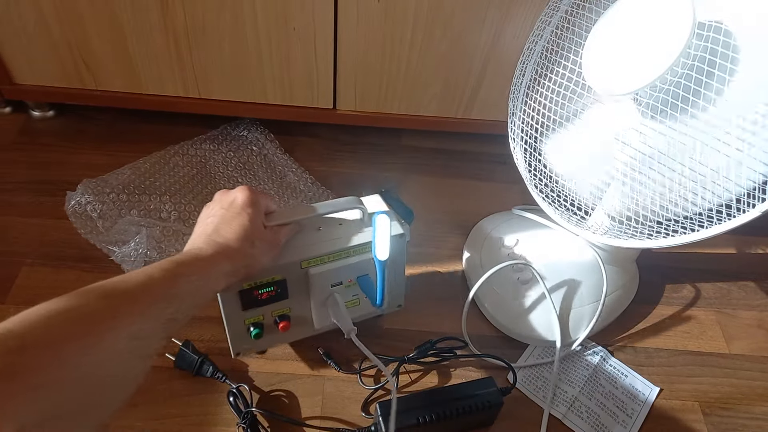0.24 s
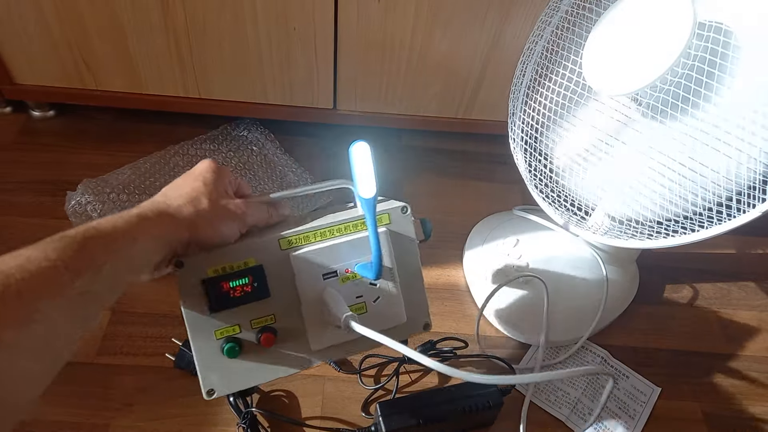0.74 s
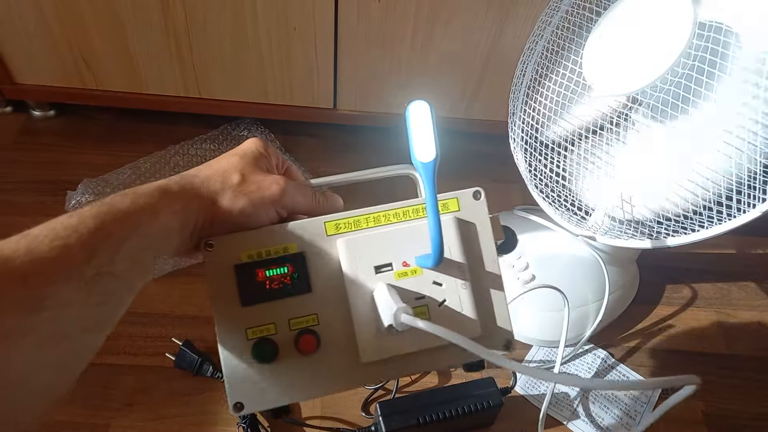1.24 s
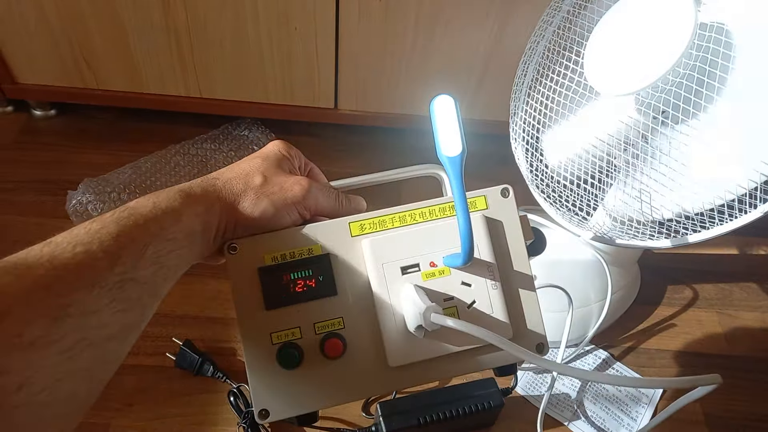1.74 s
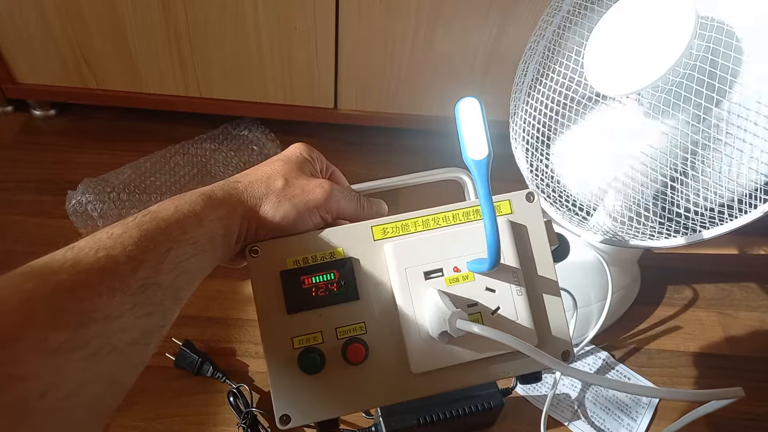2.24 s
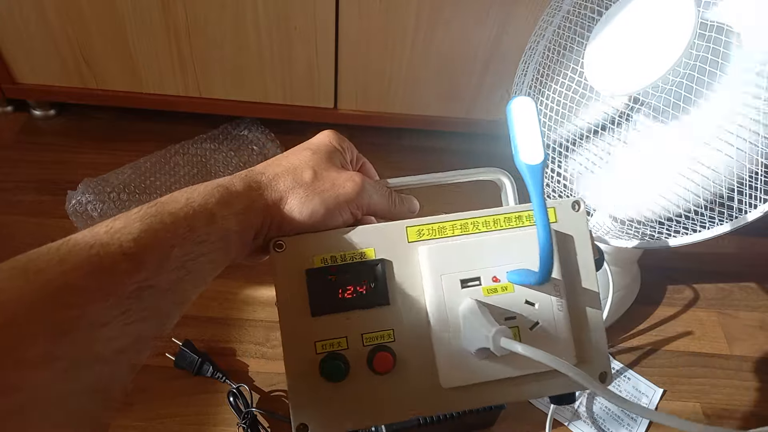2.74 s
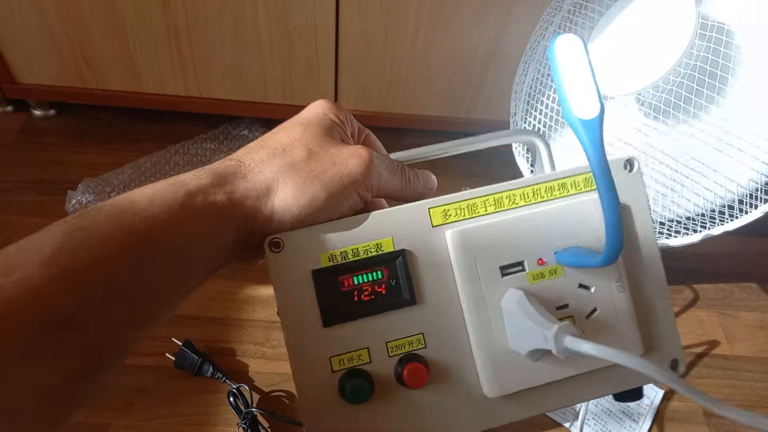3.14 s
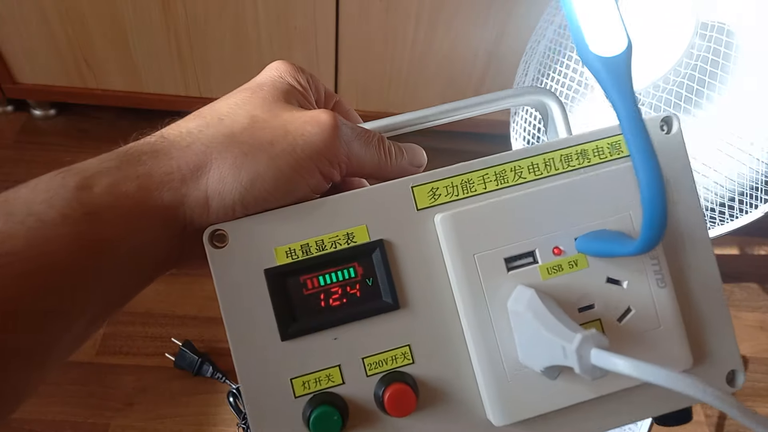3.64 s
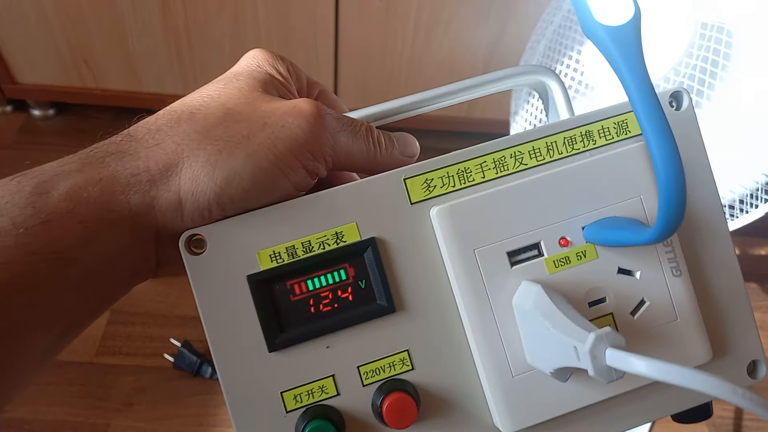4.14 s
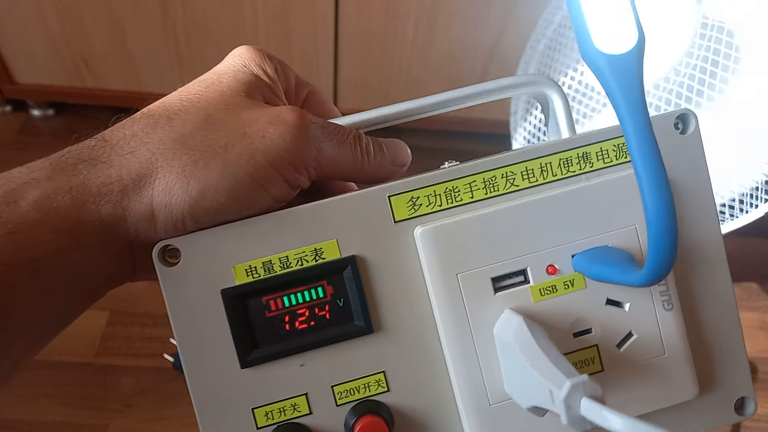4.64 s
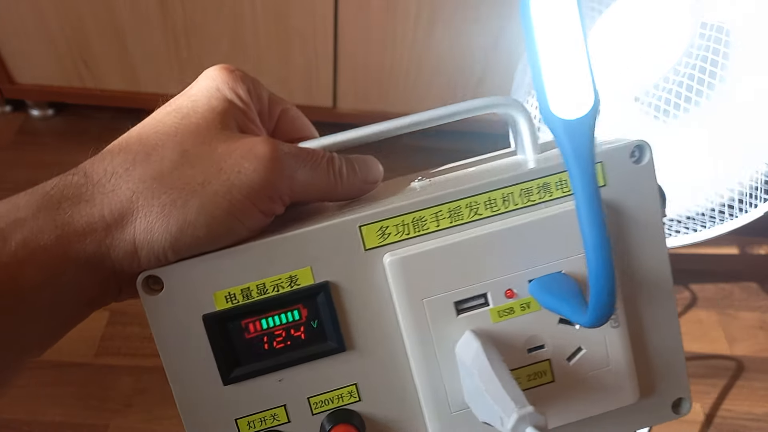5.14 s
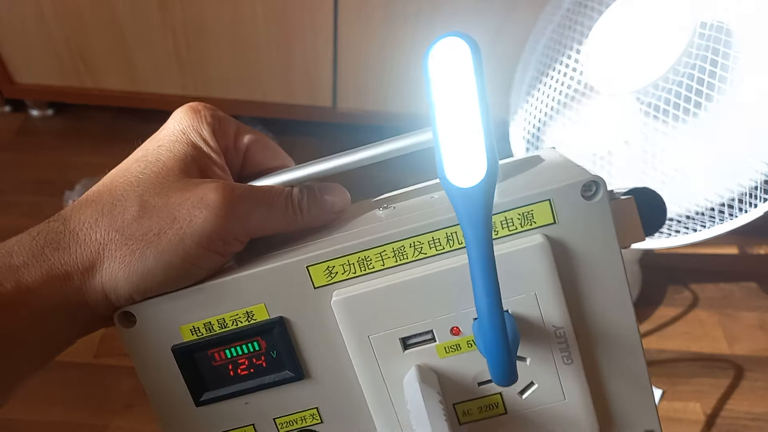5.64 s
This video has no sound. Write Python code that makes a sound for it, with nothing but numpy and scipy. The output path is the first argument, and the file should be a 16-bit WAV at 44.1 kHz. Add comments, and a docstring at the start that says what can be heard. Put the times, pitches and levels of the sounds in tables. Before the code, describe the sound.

A small desk fan runs close by in a furnished room, with a throbbing electrical hum and a soft rush of air. At the start a plastic box clicks sharply and a finger rubs and thumps the microphone on the left. The sound dips for about a second, then the fan comes back up. A tick and a few dull knocks follow as the box is lifted by its handle.

```python
"""A small desk fan, close by and off to the right, on a stereo microphone in a furnished room. Its motor
hums on the mains harmonics and throbs as the rotor slips; air rushes through blades and grille.
The fan's hand-held power box clicks, ticks and knocks as it is lifted. A finger thumps the left port,
and the recorder's limiter ducks everything for a good second before it recovers. Early on, the
microphone moves out of the room's standing waves."""
import sys
import numpy as np
from scipy import signal
from scipy.fft import rfft, irfft
from scipy.io import wavfile
from scipy.ndimage import uniform_filter1d, minimum_filter1d

SR = 44100
rng = np.random.default_rng(int(sys.argv[2]) if len(sys.argv) > 2 else 0)


def dump_mix(stems):
    """Bounce the given channels to the path in sys.argv[1] as a 16-bit WAV at rate SR."""
    frames = np.atleast_2d(stems).T  # one column per channel
    limited = np.clip(frames, -1, 1)  # hard clip at full scale
    pcm = np.round(limited * 32767).astype(np.int16)
    wavfile.write(sys.argv[1], SR, pcm)


N = 259308

BUZZ_HZ, THROB_HZ = 100.213, 13.11
# the low hum swells late in a throb cycle, the overtones above it earlier
HUM_HZ, SWELL_SPAN_HZ = 300, 370
HUM_SWELL_CYCLES, WHINE_SWELL_CYCLES = 0.82, 0.17
WHINE_MULTIPLE, WHINE_SWING = 17, 0.71
RUSH_DB, RUSH_NEAR_DB = -1, 1.5   # air gain, and its lift before the microphone moves away
LEAVE_AT_S, LEAVE_S = .72, 0.19
ROOM_T60_S, PORT_LAG_S, CUTOFF_HZ = 0.22, .00013, 15800

# motor lines: (multiple of the buzz [rounded in use], base level [dB], left-right [dB])
MOTOR_LINES = [ (1, -60, 3), (2, -68, 5.5), (3, -34.5, 3), (4, -60.5, 4), (5, -57.5, 10.5), (6, -59, -13),
               (7, -74, 19), (8, -69.5, 1.5), (9, -54.5, -5), (10, -60.5, -0.5), (11, -76, -1.5),
               (13, -72, -6.5), (14, -70, -12.5), (15, -72, -4), (16, -68.5, -1.5), (17, -63.5, 7.5),
               (19, -76, -8.5), (21, -70.5, -0.5), (22, -80.5, -1.5), (26, -74.5, -5), (27, -80, -12),
               (28, -88.5, 5.5), (63.7, -93.5, 8.5)]
# how the lines throb and wander: (frequency [Hz], depth [0-1], phase sway [rad], wander [dB])
THROB_BY_PITCH = [(300, .69, .7, .25), (500, .22, .25, 1.8), (620, .2, .2, 2.4), (920, .7, .3, 1.1),
                  (1400, .3, .3, 2.2), (1700, .65, .3, 1.6), (3000, .5, .4, 2.2)]
# the 1.7 kHz whine comes and goes; WHINE_SWING scales this curve: (time [s], unscaled level [dB])
WHINE_CURVE = [(2.0, -64), (2.78, -77.5), (2.86, -70), (4.07, -64), (4.25, -75.5), (5.84, -70.5),
               (5.88, -76.5)]
# standing waves at the microphone's first spot: (centre [Hz], width [Hz], left [dB], right [dB])
ROOM_WAVES = [(492, 98, 11.5, 14.5), (2600, 110, 12.5, 9.5), (6510, 200, 19.5, 16.5)]
# air through blades and grille: (frequency [Hz], base density [dB], left-right [dB], likeness [0-1])
AIR_SPECTRUM = [(20, -103, 6.5, .5), (47.3, -99, 3.5, 0.56), (74, -84.5, 15.5, 1), (116, -69.5, 1, 0.11),
                (171, -83, 3, 0.44), (359, -68.5, 1.5, 0.72), (493, -87.5, 4, 1), (570, -82, 2, 0.98),
                (1110, -86.5, 2, 0.057), (2510, -89, -5, 0.3), (3230, -104, 8, 0.06),
                (3700, -104, 8, 0.058), (5830, -108, 6, 0.22), (6000, -104, 11, 0.057),
                (7400, -108, -4.5, 0.057), (12500, -101, 0, .1), (15000, -106.5, 5.5, 0.1)]
# finger on the left port: (time [s], length [s], peak [dB], upper edge [Hz])
FINGER_THUMPS = [(0.0, 0.096, -13.5, 108), (0.093, 0.13, -17, 93.5), (0.214, 0.092, -16.5, 99),
                 (0.316, 0.11, -13.5, 113.6), (0.365, 0.062, 4, 127), (0.432, 0.056, 9, 306),
                 (0.486, 0.066, 5.5, 248), (0.542, .06, 10.5, 300), (0.582, 0.086, -4, 145)]
# small sharp ticks of the box: (time [s], dry peak [dB], left-right [dB], brightness [Hz])
BOX_TICKS = [(.018, -35, 21, 6970), (.2905, -35, 23, 3000), (2.368, -31, 10, 9000)]
# their bright ring: (frequency [Hz], relative level [dB], t60 [s])
TICK_RING = [(3770, -8.5, 0.0056), (4670, -14.5, 0.021), (5920, -3.5, 0.011), (6530, -3, 0.015),
             (6070, -11, 0.025)]
# clicks of the plastic case: (time [s], dry peak [dB], left-right [dB], brightness [Hz])
CASE_CLICKS = [(.0262, -19.5, 9.5, 7340), (.0375, -21.5, -16, 7060), (.0502, -12.5, 5.5, 6600),
               (.2635, -43, 22, 3980)]
# modes of the case: (frequency [Hz], relative level [dB], t60 [s])
CASE_MODES = [(1360, -10.5, 0.02), (1747, -8.5, 0.051), (2320, -12.5, 0.085), (2660, -0.5, 0.0078),
              (3197, -10, 0.021), (3740, 12, 0.0013), (4260, -6.5, 0.0052), (5800, -17, 0.0023),
              (6570, -5, 0.014)]
# dull knocks of the carrying handle: (time [s], dry peak [dB], left-right [dB], brightness [Hz])
HANDLE_KNOCKS = [(2.4, -34, 3.5, 800), (2.842, -29.5, 6.5, 1600), (2.851, -32.5, 1.5, 500),
                 (3.6872, -26.5, 4, 1800), (3.694, -31.5, 11.5, 1470), (3.7125, -51, -1, 3940)]
# modes of the hollow box under the handle: (frequency [Hz], relative level [dB], t60 [s])
BOX_MODES = [(414, 0, 0.057), (575, 0, 0.062), (680, -4.5, 0.054), (805, -3, 0.054), (1070, -6.5, 0.048),
             (1375, -4.5, 0.03), (1590, 1.5, 0.029), (2260, -7, 0.026), (5300, -3, .02)]


def from_db(db):
    """Decibels to gain."""
    return 10 ** (np.asarray(db) / 20)


def rms_one(x):
    """Scale to unit power."""
    return x / np.sqrt(np.mean(x ** 2) + 1e-20)


def seconds():
    """Time of every sample."""
    return np.arange(N) / SR


def pan(left_right_db):
    """Gains of the two channels."""
    return from_db(np.array([[.5], [-.5]]) * left_right_db)


def butter(x, edge_hz, kind, order=2):
    """Causal Butterworth filter."""
    return signal.sosfilt(signal.butter(order, edge_hz, kind, fs=SR, output="sos"), x)


def drift(rate_hz):
    """Smooth random curve of spread 1 that changes about rate_hz times a second."""
    pole = np.exp(-80 * np.pi * rate_hz / SR)
    slow = signal.lfilter([1], [1, -2 * pole, pole * pole], rng.standard_normal(N // 40 + 2002))[2000:]
    return np.interp(np.arange(N) / 40, np.arange(len(slow)), rms_one(slow))


def delayed(x, lag_s):
    """Both channels arrive later, by a fixed or a moving lag."""
    t = seconds()
    return np.array([np.interp(t - lag_s, t, channel) for channel in x])


def add(out, at_s, sound):
    """Mix a short stereo sound in at its time."""
    start = max(round(at_s * SR), 0)
    out[:, start:start + sound.shape[1]] += sound[:, :N - start]


def motor(uneven_db=0.52, sway_lag_cycles=0.067, lopsided=0.1, jitter=0.3):
    """Magnetic pull shakes the motor twice a mains cycle; rotor slip swells and sways each line."""
    t, out = seconds(), np.zeros((2, N))
    points_hz, *columns = np.transpose(THROB_BY_PITCH)
    unsteady_db = uneven_db * drift(10.0)
    for multiple, level_db, side_db in MOTOR_LINES:
        harmonic = round(multiple)
        hz = harmonic * BUZZ_HZ
        depth, sway, wander_db = [np.interp(hz, points_hz, c) for c in columns]
        hum_share = np.exp(-max(hz - HUM_HZ, 0) / SWELL_SPAN_HZ)
        swell_cycles = WHINE_SWELL_CYCLES + (HUM_SWELL_CYCLES - WHINE_SWELL_CYCLES) * hum_share
        slip = 2 * np.pi * (THROB_HZ * t - swell_cycles)
        late = slip - 2 * np.pi * sway_lag_cycles
        swell = 1 + depth * (np.cos(slip) - lopsided * np.cos(2 * slip))   # round tops, sharp dips
        swing = sway * (np.cos(late) + lopsided * np.cos(2 * late))
        line = (swell + 1j * swing) * np.exp(2j * np.pi * (hz * t + rng.random()))
        lift_db = unsteady_db + standing_wave_db(hz) + (whine_db() if harmonic == WHINE_MULTIPLE else 0)
        shortness = min(harmonic / 10, 2)   # short waves change more from place to place
        for channel in range(2):
            turn = shortness * jitter * drift(3)
            gain = from_db(level_db + lift_db[channel] + wander_db * drift(2.6)) * pan(side_db)[channel]
            out[channel] += np.sqrt(2) * gain * np.real(line * np.exp(1j * turn))
    return out


def whine_db():
    """Rise and fall of the whine about its mean level."""
    level_db = np.interp(seconds(), *np.transpose(WHINE_CURVE))
    return WHINE_SWING * (level_db - level_db.mean())


def at_first_spot():
    """Falls smoothly from 1 to 0 as the microphone leaves the place where it began."""
    return 1 / (1 + np.exp((seconds() - LEAVE_AT_S) / LEAVE_S))


def standing_wave_db(hz):
    """Standing waves lift the lines near their pitch until the microphone moves away."""
    boost_db = sum(np.array([[left_db], [right_db]]) * np.exp(-.5 * ((hz - centre_hz) / width_hz) ** 2)
                   for centre_hz, width_hz, left_db, right_db in ROOM_WAVES)
    return boost_db * at_first_spot()


def air(gain_db, flutter=0.054, swell_cycles=0.33):
    """Smooth rush of the blades, fluttering a little in step with the motor."""
    hz = np.maximum(np.arange(N // 2 + 1) * SR / N, 1)
    points_hz, *columns = np.transpose(AIR_SPECTRUM)
    level_db, side_db, alike = [np.interp(np.log(hz), np.log(points_hz), c) for c in columns]
    mid, side = rfft(rng.standard_normal((2, N)))
    ports = np.sqrt(1 + alike) * mid + np.sqrt(1 - alike) * side * [[1], [-1]]
    rush = irfft(ports * from_db(level_db) * pan(side_db), N) * np.sqrt(SR) / 2
    swell = 1 + flutter * np.cos(2 * np.pi * (THROB_HZ * seconds() - swell_cycles))
    return moving_echoes(rush) * from_db(gain_db) * swell


def moving_echoes(x, echo_db=-12, sway_s=0.00017, above_hz=1800, count=6):
    """Floor and cupboard send back the treble; as the microphone moves, their comb pattern shifts."""
    treble = butter(x, above_hz, "high")
    echoes = sum(delayed(treble, rng.uniform(0.00093, .009) + sway_s * drift(0.92)) for _ in range(count))
    return x + from_db(echo_db) * echoes


def finger_thumps(low_hz=68, body_hz=75, right_db=-52):
    """Skin drags over the left port in short lumps of rumble, brighter when pressed harder."""
    out = np.zeros((2, N))
    for at_s, length_s, peak_db, top_hz in FINGER_THUMPS:
        rumble = butter(rng.standard_normal((2, SR // 2)), low_hz, "high", order=4)
        rumble = butter(rumble, top_hz, "low", order=5)
        rumble = butter(rumble, body_hz, "low", order=1)
        # the rumble is levelled to an even strength before each thump is shaped
        strength = np.sqrt(uniform_filter1d(rumble ** 2, size=700) + 1e-12)
        size = round(length_s * SR)
        lump = (rumble / strength)[:, SR // 4:SR // 4 + size] * signal.windows.tukey(size, .7)
        # the port leaks the deepest bass and rings on briefly
        lump = butter(np.pad(lump, [(0, 0), (0, SR // 10)]), 67, "high", order=5)
        add(out, at_s, from_db([[peak_db], [peak_db + right_db]]) * lump / np.abs(lump).max())
    return out


def blows(events, modes, crack_db, crack_s, crack_hz):
    """Each contact gives a brief crack and rings every mode with a strength of its own."""
    t, out = np.arange(SR // 5) / SR, np.zeros((2, N))
    for at_s, peak_db, side_db, bright_hz in events:
        ring = np.zeros(len(t))
        for hz, level_db, t60 in modes:
            decay = from_db(level_db + rng.standard_normal() - 60 * t / t60)
            ring += decay * np.sin(2 * np.pi * (hz * t + rng.random()))
        crack = butter(rng.standard_normal(len(t)) * np.exp(-t / crack_s), crack_hz, "high")
        blow = butter(ring + from_db(crack_db) * crack, bright_hz, "low")
        add(out, at_s, from_db(peak_db) * pan(side_db) * blow / np.abs(blow).max())
    return out


def room(x, wet_db, wall_s=0.0042):
    """A diffuse tail builds up once the first wall has answered, unrelated at the two ports."""
    t = np.arange(SR // 2) / SR
    build_up = 1 - np.exp(-(t / wall_s) ** 2)
    tail = rng.standard_normal((2, len(t))) * from_db(-60 * t / ROOM_T60_S) * build_up
    tail /= np.sqrt(np.sum(tail ** 2, axis=1, keepdims=True))
    return x + from_db(wet_db) * signal.fftconvolve(x, tail, axes=1)[:, :N]


def box_ticks():
    """Small sharp contacts ring brightly, louder on the left, with little room on them."""
    return room(blows(BOX_TICKS, TICK_RING, crack_db=-8.5, crack_s=0.0014, crack_hz=1470), wet_db=-11.5)


def case_clicks():
    """The plastic case clicks in the hand, and the room answers."""
    return room(blows(CASE_CLICKS, CASE_MODES, crack_db=0.0, crack_s=0.0016, crack_hz=1404), wet_db=-1.5)


def finger_scrape(at_s=0.4565, width_s=0.021, level_db=-43, ring_db=4):
    """The finger slides over the shell with a soft, grainy hiss."""
    hiss = butter(rng.standard_normal((2, N)), 1800, "high") * from_db(1.7 * drift(120))
    hiss = hiss + from_db(ring_db) * butter(hiss, [5800, 6500], "band", order=1)
    stroke = np.exp(-.5 * ((seconds() - at_s) / width_s) ** 2)
    return room(from_db(level_db) * rms_one(hiss) * stroke, wet_db=-13)


def handle_knocks():
    """The handle knocks on the hollow box, which is too small to radiate much bass."""
    knocks = blows(HANDLE_KNOCKS, BOX_MODES, crack_db=-0.5, crack_s=0.0025, crack_hz=350)
    return butter(room(knocks, wet_db=-0.5), 240, "high")


def scene():
    """Fan, handled box and finger as they reach the microphone's two ports."""
    fan = motor() + air(RUSH_DB + RUSH_NEAR_DB * at_first_spot())
    clicks = case_clicks()
    # fan, ticks and knocks reach the left port slightly later
    airborne = fan + box_ticks() + handle_knocks()
    left = delayed(airborne, round(PORT_LAG_S * SR) / SR)[0]
    ports = np.array([left, airborne[1]])
    return ports + clicks + finger_thumps() + finger_scrape()


def limiter(x, hold_s=1.1, release_s=.36):
    """Overload pulls the gain down at once; it is held, then comes back, quickly at first."""
    over_db = 20 * np.log10(np.maximum(np.abs(x).max(axis=0), 1))
    half = round(hold_s * SR / 2)
    held_db = -minimum_filter1d(-over_db, 2 * half + 1, origin=half, mode="constant")
    fading = np.exp(-seconds() / release_s)
    cut_db = np.maximum.accumulate(held_db / fading) * fading
    ahead_db = -minimum_filter1d(-cut_db, size=400)
    smooth_db = uniform_filter1d(uniform_filter1d(ahead_db, size=200), size=200)
    return x * from_db(-smooth_db)


def record(dry):
    """The recorder has a deep hollow in the treble, a limiter and a steep top cut."""
    hollow = butter(dry, [6900, 15000], "bandstop", order=12)
    coloured = hollow + from_db(-21.0) * dry
    top_cut = signal.ellip(10, .1, 80, CUTOFF_HZ, fs=SR, output="sos")
    return signal.sosfilt(top_cut, limiter(coloured))


dry = scene()
out = record(dry)
dump_mix(out)
```